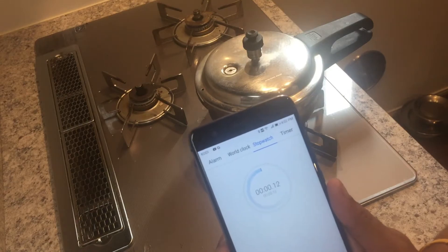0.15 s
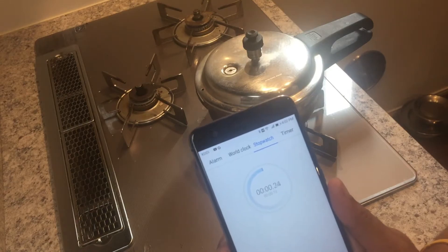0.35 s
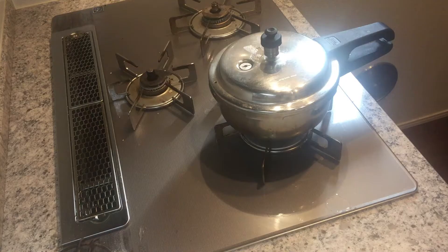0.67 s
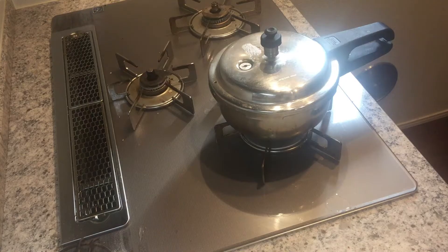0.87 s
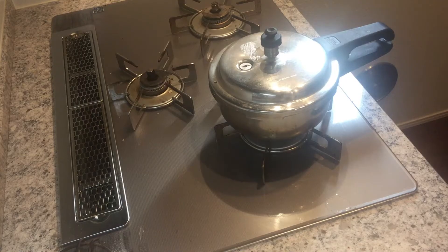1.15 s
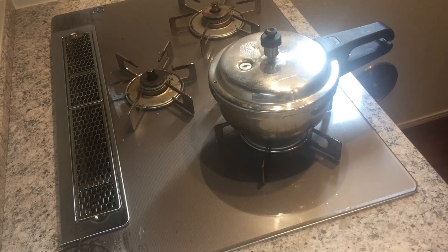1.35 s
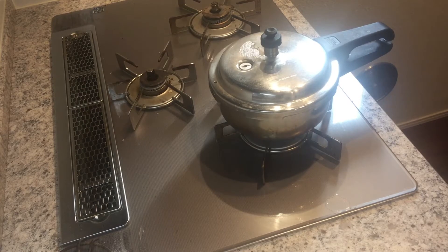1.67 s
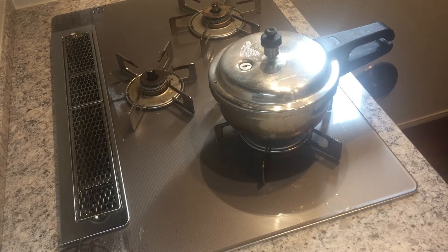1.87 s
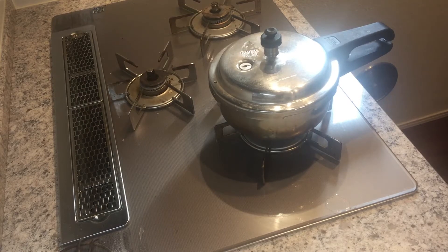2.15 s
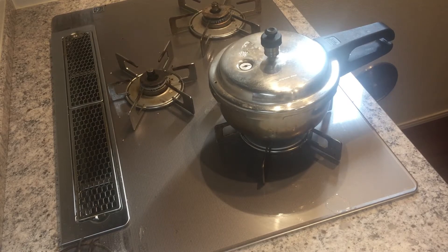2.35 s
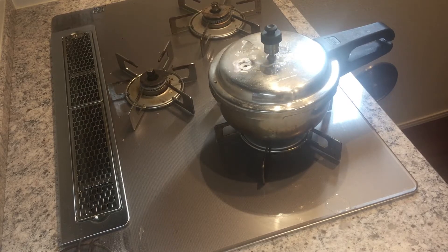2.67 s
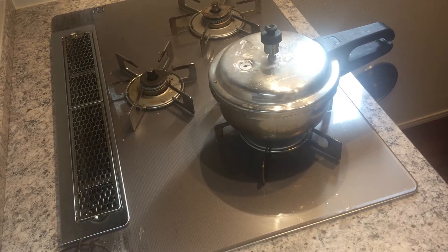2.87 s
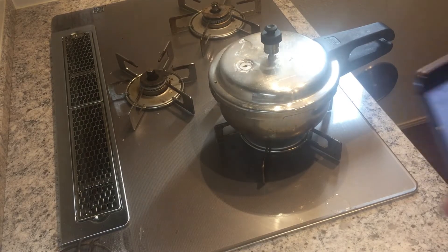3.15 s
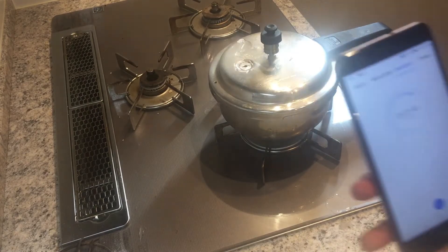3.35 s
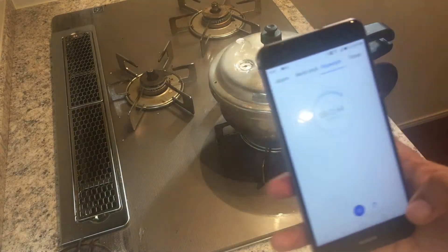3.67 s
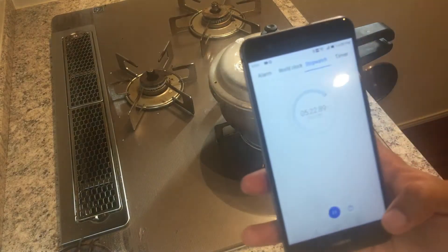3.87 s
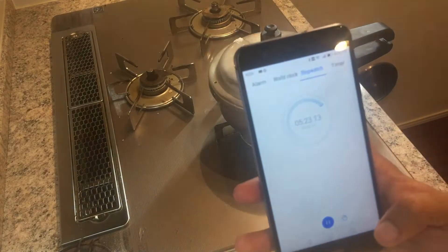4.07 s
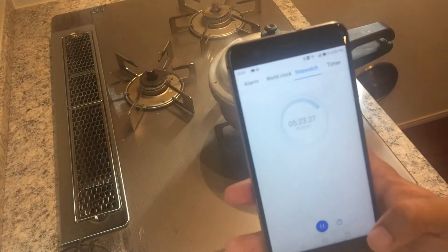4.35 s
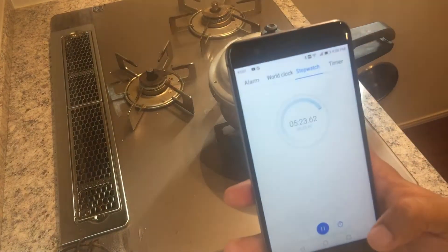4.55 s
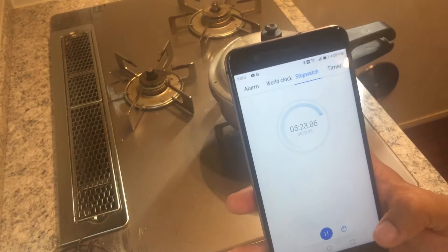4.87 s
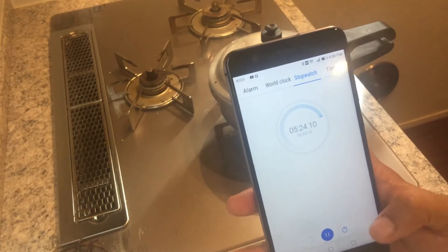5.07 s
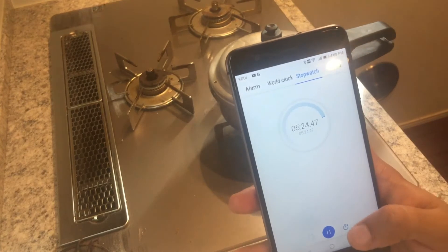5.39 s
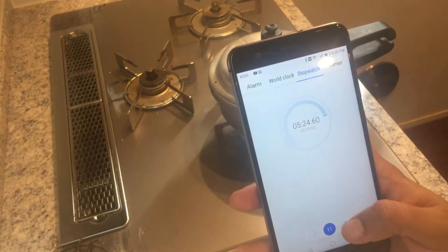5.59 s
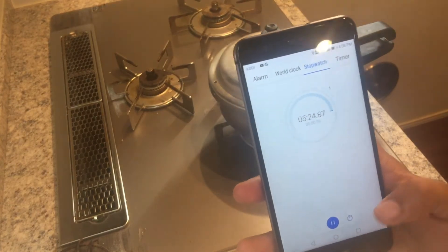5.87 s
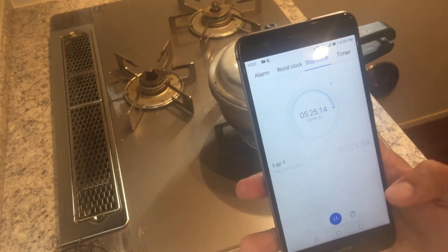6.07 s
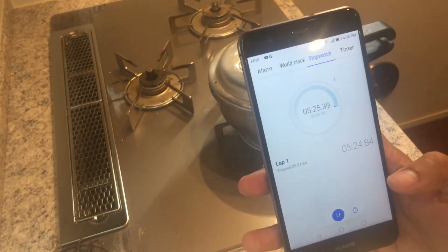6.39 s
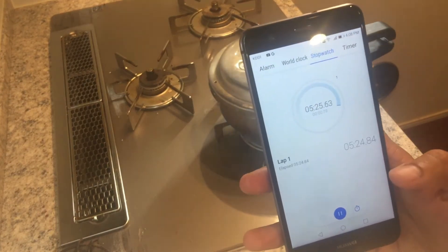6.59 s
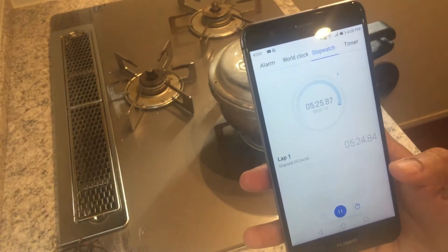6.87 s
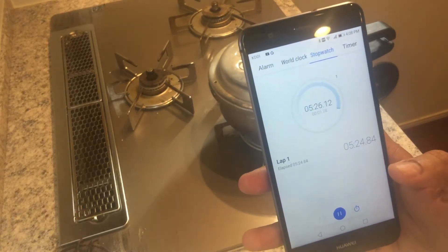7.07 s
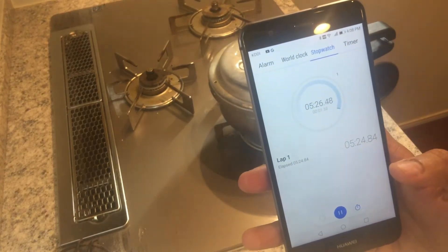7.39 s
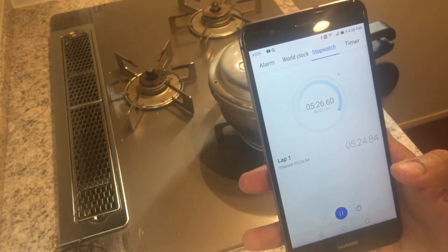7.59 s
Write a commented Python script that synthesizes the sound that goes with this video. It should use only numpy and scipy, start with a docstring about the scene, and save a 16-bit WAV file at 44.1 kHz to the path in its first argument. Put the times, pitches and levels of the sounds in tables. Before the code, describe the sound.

From arm's length, with a short hard-walled kitchen reflection: soft flame flutter, an instant of silence, then quiet boiling rumble under thin escaping steam. A brief rough puff of steam rises and dips, followed by a full blast with a low whoosh. The harsh broadband rush stays loud with small sags, masking the rumble as the recording level is automatically pulled down.

```python
"""In a kitchen, a pressure cooker on a gas hob is heard from an arm's length. The burner flutters; after a
short gap the scene changes: the pot rumbles and steam seeps past the weight valve as a thin hiss. Steam lifts
the weight once, lets it drop, then blows it open into a loud steady jet that darkens. Each sound is random
noise, shaped by a broad spectrum and most often by resonances as well. The recorder's gain control holds the
jet down, and the low rumble sinks with it."""
import sys
import numpy as np
from scipy import signal
from scipy.fft import rfft, irfft
from scipy.io import wavfile
from scipy.ndimage import uniform_filter1d

SR = 44100
rng = np.random.default_rng(int(sys.argv[2]) if len(sys.argv) > 2 else 0)


def master_out(mix):
    """Clip the mix to full scale and print it as 16-bit PCM to the path in sys.argv[1]."""
    frames = np.transpose(np.atleast_2d(mix))
    ceiling = np.clip(frames, -1, 1)
    pcm = np.round(ceiling * 32767).astype(np.int16)
    wavfile.write(sys.argv[1], SR, pcm)


N = 340817
TIME = np.arange(N) / SR  # s
FREQ = np.maximum(np.arange(N // 2 + 1) * SR / N, 1)  # Hz, kept above 0 for the logarithms
SILENCE_START_S, SILENCE_END_S = 0.478, 0.525
CUT_HZ = 15920  # nothing is heard above this

# the weight lifts, drops back once, then blows open and stays up:
# [t/s, level of the jet before sags and gain control/dB]
LIFT = [(2.0, -34), (2.12, -27.5), (2.2, -15), (2.27, -16), (2.325, -24.5), (2.395, -7.5), (2.5, -3),
        (2.65, 1), (4.5, 7.5)]
LIFT_S = LIFT[0][0]  # when the first steam bursts out


def jet():
    """Steam blasts from under the rocking weight, gruff at first; the top hiss eases as the vent rings."""
    # broad colour of the jet: [f/Hz, level/dB]
    jet_spectrum = [(150, -31.5), (700, -24), (880, -20), (970, -14), (1850, -12.5), (2050, -5.5),
                    (2700, -10.0), (2950, -4.5), (5500, -2.5), (7800, -2.5), (9700, 0.0), (10500, -5),
                    (11300, -2.0), (12700, -5), (15600, -6.5)]
    # resonances of the valve and of the space between lid, hob and wall: [f/Hz, width/Hz, lift/dB]
    jet_peaks = [(1270, 30, 3.2), (1432, 48, 1.6), (1572, 240, 3.1), (1830, 30, 3.9), (2024, 30, 3.8),
                 (2283, 48, 6), (2347, 30, 3.9), (2541, 30, 5), (2713, 30, 3.1), (2878, 30, 2.5),
                 (2920, 230, 4.2), (3413, 240, 3), (3478, 30, 3.2), (3672, 30, 3), (3951, 135, 1.9),
                 (4608, 30, 4), (4705, 48, 4.5), (5114, 48, 4.4), (5717, 78, 2.9), (5943, 48, 5.8),
                 (6223, 48, 5.4), (6481, 48, 4.1), (6790, 44, 4.4), (6926, 72, 5.6), (7474, 30, 3.5),
                 (7605, 44, 3.2), (8333, 48, 3.4), (8880, 72, 2.8), (9680, 50, 2), (10831, 420, 2.7)]
    flow = turbulence(surge_db=0.56, surge_rate=34, eddy_db=0.75, eddy_rate=22)
    rush = rfft(colour(flow, jet_spectrum, jet_peaks))
    age = np.maximum(TIME - LIFT_S, 0)

    # the first steam is wet and gruff: it has extra low roar until it clears
    gruff_db, gruff_clears_s, gruff_fade_s = 11, 2.38, 0.11
    gruff = (TIME > LIFT_S) * (1 - np.tanh((TIME - gruff_clears_s) / (2 * gruff_fade_s))) / 2

    # big eddies make the low roar, the finest ones the top hiss
    roar_hz, top_hiss_hz = 2010, 9500
    low = 1 / (1 + (FREQ / roar_hz) ** 6)
    top = 1 / (1 + (top_hiss_hz / FREQ) ** 16)
    # as the pressure falls the roar gains and the top hiss eases
    roar_db, roar_rise_db_per_s = -1.84, 0.42
    hiss_db, hiss_fall_db_per_s, blast_hiss_db = 1.84, 0.62, 4
    roar_level_db = roar_db + roar_rise_db_per_s * age + gruff_db * gruff
    hiss_level_db = hiss_db - hiss_fall_db_per_s * age + blast_hiss_db * blast()
    roar = irfft(rush * low, N) * undb(roar_level_db)
    hiss = irfft(rush * top, N) * undb(hiss_level_db)
    body = irfft(rush * (1 - low - top), N)
    steam = roar + body + hiss + vent(jet_peaks)
    return kitchen(unit(steam), wet_db=-9) * opening()


def vent(peaks):
    """Late in the blow the vent sings shrilly in a narrow band of noise, breathy and unsteady."""
    vent_hz, vent_width_hz = 6700, 1150
    vent_starts_s, vent_swell_s, vent_db = 4.8, 2.3, -12.5
    gain = undb(resonances(peaks)) / (1 + (2 * (FREQ - vent_hz) / vent_width_hz) ** 4)
    ring = unit(irfft(rfft(rng.standard_normal(N)) * gain, N))
    return ring * undb(vent_db + 2.3 * walk(18)) * ramp(vent_starts_s, vent_swell_s)


def opening():
    """Flow past the weight sets the jet's level: the weight lifts, then rocks and now and then sags."""
    # the rocking weight sags and pinches the jet: [t/s, depth/dB]
    sags = [(3.22, 1.2), (3.59, 1.1), (3.76, 3.5), (4.33, 2), (4.93, 1), (5.49, 2), (5.94, 1.3),
            (6.53, 0.3), (6.81, 0.8)]
    sag_s = 0.047  # half the length of a sag
    rock_db, rock_rate = 0.21, 9.8  # small random rocking, moves per second
    sag_db = sum(depth * np.exp(-((TIME - at) / sag_s) ** 2) for at, depth in sags)
    return undb(curve(LIFT) - sag_db + rock_db * walk(rock_rate)) * (TIME > LIFT_S)


def blast():
    """A short swell, 0 to 1 and back, as the valve blows fully open."""
    middle_s, half_length_s = 2.515, 0.073
    return np.exp(-((TIME - middle_s) / half_length_s) ** 2)


def gust():
    """A low whoosh as the first full head of steam pushes into still air."""
    # broad colour of the whoosh: [f/Hz, level/dB]
    gust_spectrum = [(100, -22), (300, -4), (520, -1), (800, -4), (1600, -18)]
    gust_db = -23.5
    return colour(rng.standard_normal(N), gust_spectrum, []) * undb(gust_db) * blast()


def seep():
    """Thin hiss through the valve seat: it grows with the pressure and fades once the weight lifts."""
    # broad colour of the seeping steam: [f/Hz, level/dB]
    seep_spectrum = [(400, -47), (1000, -16), (1800, -8.5), (2600, -10), (3100, -5), (4500, -6),
                     (8000, -5.5), (9500, 0.5), (11000, -6.4), (15600, -6)]
    # resonances around the seeping steam: [f/Hz, width/Hz, lift/dB]
    seep_peaks = [(2014, 60, 8.6), (2260, 157, 6.2), (2990, 140, 7.3), (3260, 70, 3.8), (3540, 230, 5),
                  (5920, 45, 4), (6230, 750, 7.3), (6700, 48, 7.4), (8400, 70, 4), (13544, 630, 3)]
    seep_db, seep_rise_db_per_s, seep_fade_s = -31, 1.5, 0.55
    flow = turbulence(surge_db=.3, surge_rate=20, eddy_db=0.8, eddy_rate=18)
    hiss = kitchen(colour(flow, seep_spectrum, seep_peaks), wet_db=-6)
    level_db = seep_db + seep_rise_db_per_s * (TIME - SILENCE_END_S)
    seated = (1 - ramp(LIFT[1][0], seep_fade_s)) * (TIME > SILENCE_START_S)
    return hiss * undb(level_db) * seated


def pot():
    """Boiling water rings the hollow modes of the pot; the flame throbs in the gap beneath it."""
    # broad colour of the boil: [f/Hz, level/dB]
    rumble_spectrum = [(25, -33), (50, -18), (80, -34), (150, -5), (250, -2), (350, -8), (550, -11.5),
                       (650, -4.5), (900, -15.5), (1200, -20), (3000, -38)]
    # resonances and one notch of the pot and the hollow under it: [f/Hz, width/Hz, lift/dB]
    pot_peaks = [(178, 39, 4), (475, 77, 8.5), (590, 52, -13), (814, 38, 14.5)]
    # broad colour of the throbbing flame: [f/Hz, level/dB]
    throb_spectrum = [(25, -37), (55, -14.5), (100, 1), (140, -2.5), (250, -27), (1000, -70)]
    # resonance of the throbbing flame: [f/Hz, width/Hz, lift/dB]
    throb_peaks = [(104, 32, 7)]
    boil_db, throb_db = -35.5, -39.5
    puff_db, puff_rate = 2.1, 6  # random puffs of the flame, per second
    flare_s, flare_rise_s, flare_db = 1.47, .1, 3.5  # the flame steps up once
    boil = colour(rng.standard_normal(N) * undb(0.96 * walk(20)), rumble_spectrum, pot_peaks)
    throb = colour(rng.standard_normal(N) * undb(3.2 * walk(24)), throb_spectrum, throb_peaks)
    throb_level_db = throb_db + flare_db * ramp(flare_s, flare_rise_s) + puff_db * walk(puff_rate)
    return (boil * undb(boil_db) + throb * undb(throb_level_db)) * (TIME > SILENCE_START_S)


def burner():
    """The low flutter of the gas flame, alone before the steam: noise whose level wavers at random."""
    # broad colour of the flame: [f/Hz, level/dB]
    burner_spectrum = [(30, -27), (60, -17), (100, -7), (135, -10), (200, -2.5), (290, -8.5), (450, -14.5),
                       (620, -12), (900, -20.5), (1200, -27), (1800, -25.5), (3200, -36), (8000, -41),
                       (15600, -49)]
    # resonances around the flame: [f/Hz, width/Hz, lift/dB]
    burner_peaks = [(167, 25, 9.1), (236, 43, 6.8)]
    burner_db, flutter_db, flutter_rate = -40, 1.1, 18  # rate in flutters per second
    flame = colour(rng.standard_normal(N), burner_spectrum, burner_peaks)
    return flame * undb(burner_db + flutter_db * walk(flutter_rate)) * (TIME < SILENCE_END_S)


def kitchen(x, wet_db, sway_rate=0.718, count=3):
    """Hard walls return a short tail; the weight turns and sprays new surfaces, so the ripple wanders."""
    t60_s = 0.22  # time for the tail to fall by 60 dB
    age = TIME[:SR // 4]
    wet = 0
    for _ in range(count):
        tail = rng.standard_normal(len(age)) * undb(-60 * age / t60_s) * (age > .002)
        wet = wet + signal.fftconvolve(x, tail)[:N] * walk(sway_rate)
    # the steam only changes direction, so the reflected power stays even
    wet = wet / np.sqrt(uniform_filter1d(wet ** 2, SR // 10))
    return unit(x + undb(wet_db) * wet)


def turbulence(surge_db, surge_rate, eddy_db, eddy_rate, count=20):
    """Flow noise: the whole stream surges, and eddies of each size come and go on their own."""
    noise = rfft(rng.standard_normal(N))
    # overlapping bands, evenly spaced in pitch, stand for the sizes of eddy
    place = np.interp(np.log(FREQ), np.log([500, 16000]), [0, count - 1])
    stream = 0
    for k in range(count):
        band = irfft(noise * np.maximum(1 - abs(place - k), 0), N)
        stream = stream + band * undb(eddy_db * walk(eddy_rate))
    return stream * undb(surge_db * walk(surge_rate))


def resonances(peaks):
    """Lift in dB that a set of resonances gives to each frequency."""
    return sum(db / (1 + (2 * (FREQ - hz) / width) ** 2) for hz, width, db in peaks)


def colour(x, spectrum, peaks):
    """Pass a sound through a broad spectrum and its resonances, then scale it to rms 1."""
    hz, db = np.transpose(spectrum)
    broad_db = np.interp(np.log(FREQ), np.log(hz), db)
    gain = undb(broad_db + resonances(peaks))
    return unit(irfft(rfft(x) * gain * (FREQ < CUT_HZ), N))


def walk(rate):
    """Random levels, rate new ones per second, joined by slopes; rms 1."""
    hold = max(int(SR / rate), 2)  # samples per level
    steps = np.repeat(rng.standard_normal(N // hold + 1), hold)[:N]
    return unit(uniform_filter1d(steps, hold))


def undb(db):
    """Decibels to gain."""
    return 10 ** (np.asarray(db) / 20)


def curve(table):
    """Rows of (s, value), joined by straight lines in time."""
    return np.interp(TIME, *np.transpose(table))


def unit(x):
    """Scale to rms 1."""
    return x / np.sqrt(np.mean(x ** 2))


def ramp(start, length):
    """Rises from 0 to 1 over length seconds, then holds."""
    return np.clip((TIME - start) / length, 0, 1)


def lag(x, seconds):
    """Follow a signal smoothly with a time constant."""
    keep = np.exp(-1 / (seconds * SR))
    return signal.lfilter([1 - keep], [1, -keep], x)


def gain_control(x):
    """Turn down quickly, looking a little ahead, by whatever exceeds the ceiling; recover slowly."""
    ceiling_db, release_db_per_s = -10.5, 1
    sense_s, attack_s, ahead_s = 0.033, 0.0096, 0.027
    heard_db = 10 * np.log10(lag(np.mean(x ** 2, axis=0), sense_s) + 1e-12)
    excess_db = np.maximum(heard_db - ceiling_db, 0)
    # hold the largest cut so far, less what has been recovered since
    recovery_db = release_db_per_s * TIME
    cut_db = np.maximum.accumulate(excess_db + recovery_db) - recovery_db
    smooth_cut_db = lag(cut_db, attack_s)
    return x * undb(-np.interp(TIME + ahead_s, TIME, smooth_cut_db))


def scene():
    """All sources add up, the same in both ears; a short gap, where the scene changes, comes before the steam."""
    sounding = (TIME < SILENCE_START_S) | (TIME > SILENCE_END_S)
    mix = jet() + gust() + seep() + pot() + burner()
    return np.tile(mix * sounding, (2, 1))


def record(dry):
    """The recorder turns the loud jet down, clips at full scale and cuts the top."""
    low_pass = signal.ellip(12, .1, 70, CUT_HZ, fs=SR, output="sos")
    return signal.sosfilt(low_pass, np.clip(gain_control(dry), -1, 1))


dry = scene()
out = record(dry)
master_out(out)
```